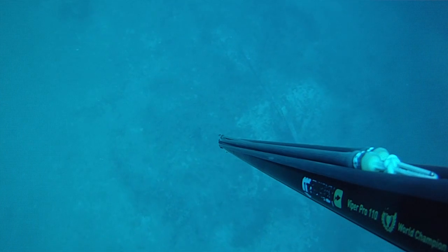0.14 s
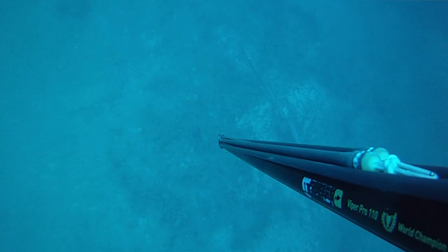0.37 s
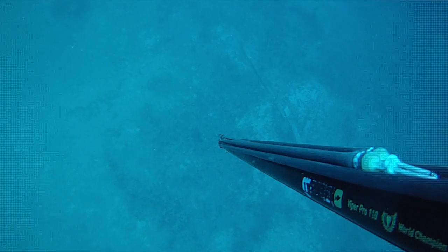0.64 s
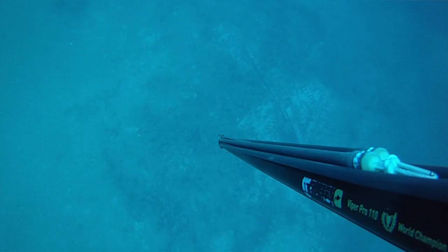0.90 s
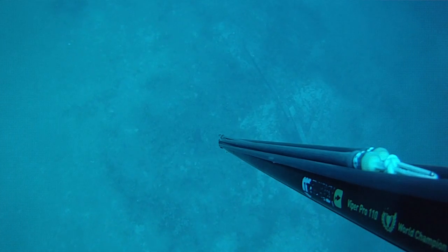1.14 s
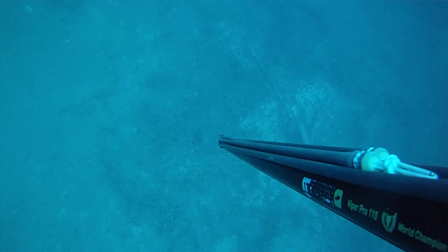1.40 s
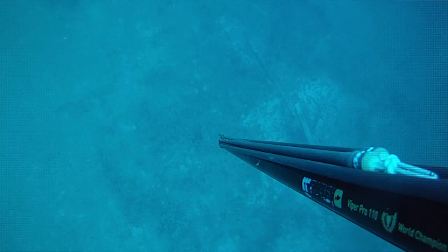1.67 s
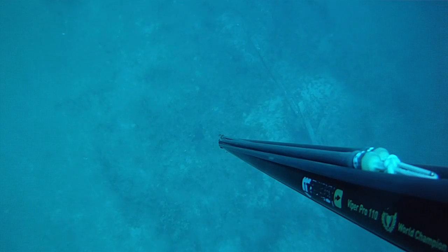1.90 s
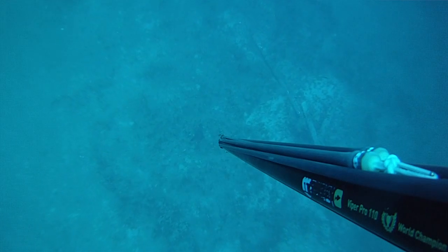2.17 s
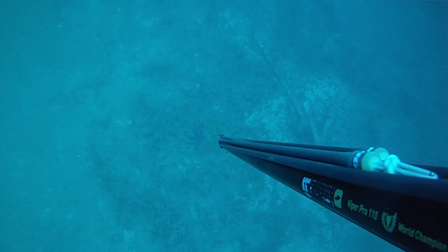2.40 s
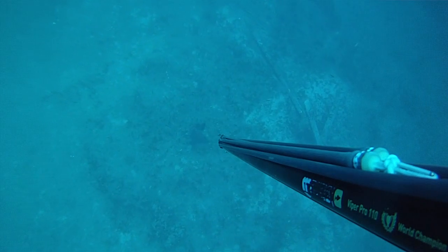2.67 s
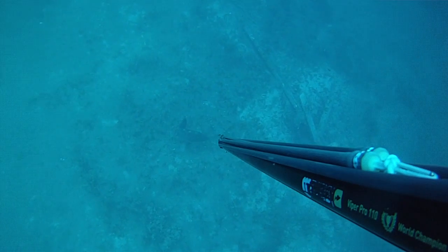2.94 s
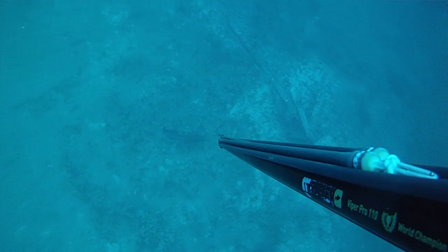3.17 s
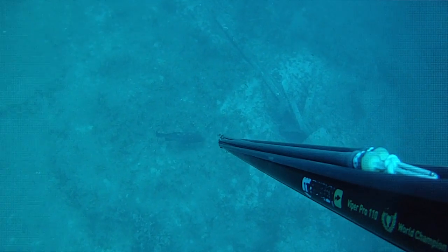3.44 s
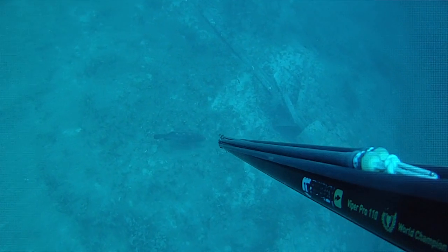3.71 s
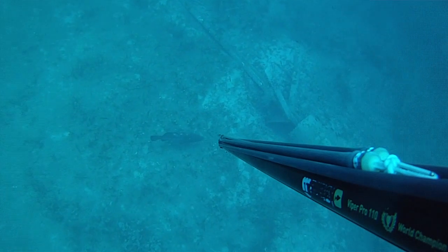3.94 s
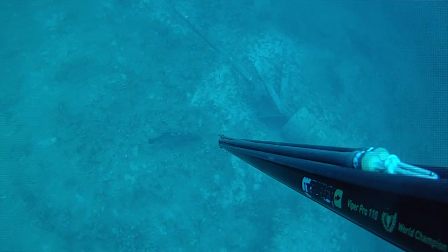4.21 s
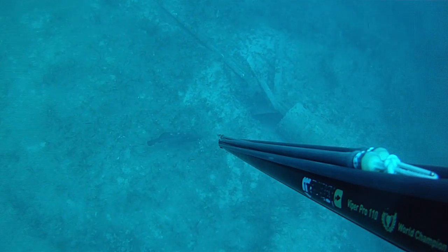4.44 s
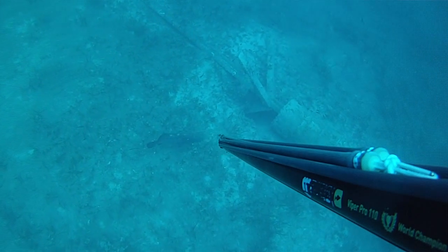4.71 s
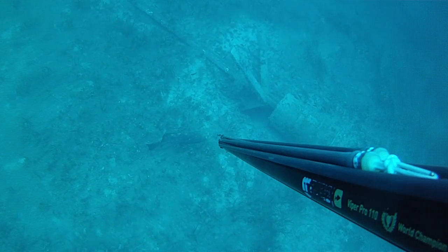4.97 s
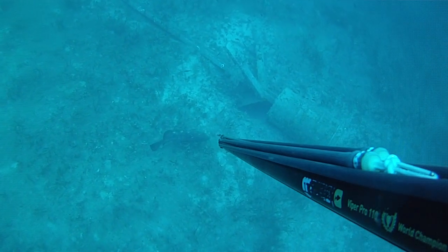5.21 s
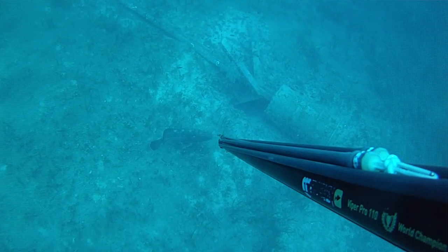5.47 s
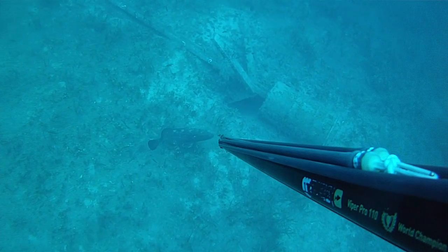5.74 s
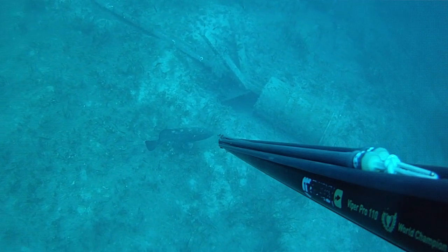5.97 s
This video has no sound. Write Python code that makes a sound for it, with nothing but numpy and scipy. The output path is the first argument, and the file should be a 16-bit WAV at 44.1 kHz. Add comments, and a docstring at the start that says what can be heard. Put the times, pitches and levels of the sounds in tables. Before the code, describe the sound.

The sound is underwater, boxed in and resonant, as if heard through a sealed case fixed near a speargun. From the start a distant boat motor idles unevenly, about sixteen turns a second, as hollow mid-pitched knocks blurred by a fine pattering wash. Hiss and a very faint high whine lie beneath, while shrimp crackle near and far; one bright snap comes at 0.15 seconds. At 0.5 a single violent, metallic crack overloads the microphone and dies within hundredths of a second; the background drops, then recovers over the next half second or so. Motor chatter continues, its low throb swelling and fading. From 2.9 to 3.5 louder knocks crowd together into a rattle and a hollow tone rises, peaking near 3.3. Soft grip thuds come at 3.9 and 5.2, more knocks around 4.7 to 4.9, and a sharp shrimp snap at 5.9, before it stops with the motor still idling at 6.1.

```python
"""A boat motor knocks at idle far off: four noise bursts a turn over a patter of tiny ticks, rung by a watertight case.
Under it sit a low throb, one held case tone and single louder knocks; shrimp snap near and far as sizzling clicks,
and the grip thuds softly as short swelling sines.
Half a second in, one hard blow on the speargun rings it as decaying modes, overloads the microphone and ducks the gain.
Hiss and a faint whine lie underneath."""
import sys
import numpy as np
from scipy import signal
from scipy.fft import rfft, irfft, next_fast_len
from scipy.io import wavfile

SR = 44100
rng = np.random.default_rng(int(sys.argv[2]) if len(sys.argv) > 2 else 0)


def to_wav(sig):
    """Store sig (one row per channel, or 1-D mono) as 16-bit WAV at the path in sys.argv[1].

    Samples outside -1..1 are clipped; the rate is SR.
    """
    pcm = np.clip(np.atleast_2d(sig), -1, 1) * 32767
    pcm = np.round(pcm).astype(np.int16)
    wavfile.write(sys.argv[1], SR, pcm.T)  # frames by channels


def gain_from_decibels(decibels):
    """Convert decibel values to linear amplitude factors."""
    exponent = np.asarray(decibels, float) / 20
    return 10 ** exponent


N = 269451  # samples


def rms_one(x):
    """Scale to unit rms."""
    return x / np.sqrt(np.mean(x ** 2) + 1e-20)


def in_time(rows):
    """Draw each column of a breakpoint table as a curve, one value a sample."""
    s, *columns = np.transpose(rows)
    return [np.interp(np.arange(N) / SR, s, column) for column in columns]


def resonate(x, hz, width_hz):
    """Two-pole resonance with a gain of about 1 at its top."""
    r = np.exp(-np.pi * width_hz / SR)
    feedback = [1, -2 * r * np.cos(2 * np.pi * hz / SR), r * r]
    return signal.lfilter([(1 - r * r) / 2, 0, (r * r - 1) / 2], feedback, x + 1e-18)


def drift(corner_hz):
    """Slow random wander with unit rms: noise through two equal low-pass poles."""
    r = np.exp(-2 * np.pi * corner_hz / SR)
    wander = signal.lfilter([1], [1, -2 * r, r * r], rng.standard_normal(N + SR))
    return rms_one(wander[SR:])  # the first second lets the filter settle


# resonances of the air and walls of the case: [pitch_hz, width_hz, level_db]
CASE_MODES = [(350, 790, -35), (735, 110, -23), (1005, 86.5, -8.5), (1164, 98, -2), (1320.7, 104, 0),
              (1620, 155, -3), (1793, 270, -15.5), (1997, 95, -40.5), (2433, 180, -23.5),
              (2937, 135, -22.5), (3426, 330, -30), (4650, 500, -33.5), (6520, 1100, -41),
              (6740, 1700, -56), (11200, 2300, -61.5), (14400, 1760, -44.5)]


def case(x, low_hz=0, high_hz=SR):
    """The case's resonances in parallel, signs alternating, so that dips fall between them."""
    return sum((-1) ** k * gain_from_decibels(level_db) * resonate(x, hz, width_hz)
               for k, (hz, width_hz, level_db) in enumerate(CASE_MODES) if low_hz <= hz < high_hz)


FLUTTER_DB, FLUTTER_HZ = 1.62, 48.4  # rms spread and corner of the drift


def fluttering_case(x):
    """The same resonances, each fed a little more or less from moment to moment."""
    out = 0
    for k, (hz, width_hz, level_db) in enumerate(CASE_MODES):
        fed = x * gain_from_decibels(FLUTTER_DB * drift(FLUTTER_HZ))
        out = out + (-1) ** k * gain_from_decibels(level_db) * resonate(fed, hz, width_hz)
    return out


# hiss spectrum ahead of the port's notch: [pitch_hz, level_db per Hz]
HISS_SPECTRUM = [(25, -94), (45, -90.5), (100, -97.5), (250, -95), (600, -91.5), (2000, -104), (6500, -109),
                 (10500, -109), (12500, -108), (15400, -101)]
WHINE_HZ, WHINE_RMS_DB = 7870, -65.5  # level ahead of the port's notch


def microphone_noise():
    """Smooth hiss and a faint steady whine of the electronics: shaped noise plus one sine."""
    size = next_fast_len(N)
    hz = np.maximum(np.arange(size // 2 + 1) * SR / size, 1)
    curve_hz, curve_db = np.transpose(HISS_SPECTRUM)
    colour = gain_from_decibels(np.interp(np.log(hz), np.log(curve_hz), curve_db)) * np.sqrt(SR / 2)
    hiss = irfft(rfft(rng.standard_normal(size)) * colour, size)[:N]
    whine = np.sqrt(2) * np.sin(2 * np.pi * WHINE_HZ * np.arange(N) / SR)
    return hiss + gain_from_decibels(WHINE_RMS_DB) * whine


# soft contacts of the grip: [start_s, level_db, pitch_hz, length_s]
GRIP_THUDS = [(0.277, -44.5, 363, 0.0038), (0.567, -52, 328, 0.017), (3.895, -35.5, 350, 0.014),
              (3.896, -51, 174, 0.021), (5.196, -45.5, 110, 0.012), (5.197, -38, 540, 0.0028),
              (5.203, -35.5, 380, 0.012), (5.465, -62, 70, 0.012)]


def thuds():
    """Soft contacts: each a low sine of one to six cycles that swells and dies."""
    out = np.zeros(N)
    for start_s, level_db, hz, length_s in GRIP_THUDS:
        t = np.arange(round(length_s * SR)) / SR
        at = round(start_s * SR)
        swell = np.sin(np.pi * t / length_s)
        out[at:at + len(t)] += gain_from_decibels(level_db) * swell * np.sin(2 * np.pi * hz * t)
    return out


# near snaps, weighed further by the parts below; the last three columns are relative to level_db:
# [start_s, level_db around 6.5 kHz, mid_db around 4.5 kHz, low_db below 3.2 kHz, top_db above 9 kHz]
NEAR_SNAPS = [(0.0427, -53, -3, 15, -21.5), (0.146, -33.5, 1, 4.5, -22), (0.1577, -53.5, 3, 18, -21),
              (0.173, -54, 4, 8, -21), (0.2097, -54, -7, 4, -30), (0.449, -54.5, -7, 13.5, -22),
              (0.6669, -52, 3, 7, -24), (0.7063, -56, 6, 20, -24), (0.7335, -49, -1, 10, -22),
              (0.9996, -49, 3, -2, -20), (1.186, -49, -7, 8, -22.5), (1.303, -48, -12, 1, -21),
              (1.544, -53, 4, 12.5, -21), (1.6073, -41.5, -2, 9, -20), (1.85, -52.5, 0, 1, -25),
              (1.899, -51, 1, -4, -19), (1.9584, -56, 5, -2, -21), (2.0467, -48, -10, -9, -18),
              (2.075, -49.5, -3, 3, -23), (2.111, -48, -2, 5.5, -18), (2.204, -46, -8, -6, -20),
              (2.3355, -51, -9, 5, -18.5), (2.38, -47.5, -1, 3, -26), (2.384, -47, -2, 10, -24),
              (2.4214, -45, 0, 6, -23), (2.497, -50, -1, 12.5, -25), (2.5052, -50.5, 5.5, 7, -23.5),
              (2.5412, -50, -2, -2, -22.5), (2.5562, -39, -4, -7, -17), (2.588, -56, 0, 9, -22),
              (2.711, -57, -3, 4, -22), (2.7647, -54, -3, 10, -25), (2.7915, -47, -7, 2, -27.5),
              (2.877, -48, -3, 9, -19), (2.8803, -42, 3, 11, -19.5), (2.994, -51.5, 7, 19, -20.5),
              (3.0335, -53, -1, 13, -23.5), (3.0686, -48.5, -8, -2, -22.5), (3.1953, -51, -6, -6, -22.5),
              (3.2173, -51, -4, -4, -22), (3.235, -50.5, 4.5, 17, -20), (3.2753, -52, 4, 12, -23),
              (3.809, -54, 2.5, 11, -23), (3.909, -50, 3.5, 11, -21), (4.1664, -53, -4.5, 5, -17),
              (4.2712, -55, 9.5, 12, -23), (4.2748, -50.5, 1.5, 17, -20), (4.285, -61, 0, 2, -23),
              (4.384, -50.5, 0, 4, -22), (4.4069, -58, 9, 14, -18), (4.431, -54, -2, 3, -24),
              (4.4717, -40.5, -4, 1, -29.5), (4.477, -50.5, 0, 10, -15), (4.6163, -52, -5, 1, -21.5),
              (4.6685, -49.5, -6, -5, -15.5), (4.7736, -48.5, -8, -3, -19), (4.7891, -49, -6, 1, -18),
              (4.814, -56, 10.5, 19, -24), (4.846, -58, 12, 16, -24), (4.9119, -48, 0, 9.5, -19),
              (4.9453, -58, 1, 9, -21), (4.9935, -50, -1, 2, -19), (5.0975, -59, 9, 11.5, -28),
              (5.231, -61, 8, 0, -19), (5.237, -71, 11, -10, -20), (5.3697, -54, 2, 6, -22),
              (5.4714, -52, 6.5, 14, -20), (5.4987, -57, 15, 5, -21), (5.542, -50, 4, -1, -21),
              (5.5646, -52, 3, 7, -20.5), (5.5891, -43.5, -11, -8, -23), (5.8235, -56, 10, 12, -21),
              (5.8275, -52, 10, 19, -21), (5.8491, -53.5, 2, 0, -21), (5.908, -32, -7, -7, -18.5),
              (5.9343, -49, -10, -3, -18), (5.9397, -51, -1.5, -5, -20), (6.0067, -45, -3, 7, -21),
              (6.0548, -52, 7, 9, -26.5)]
# parts of the case that a snap rings: [low_hz, high_hz, level_db]
RUNG_PARTS = [(5500, 9000, 3.5), (3200, 5500, 5), (1900, 3200, -1.5), (9000, 20000, 8.5), (1, 1900, -5)]
# far snaps: base rate and level floor; the rate clumps by a drift in dB, the colour varies by part
FAR_SNAPS_PER_S, FAR_CLUMP_DB, FAR_CLUMP_HZ = 170, 2.5, 9.0
FAR_SNAP_DB, FAR_SNAP_SPREAD_DB, FAR_COLOUR_DB = -66.5, 3.5, 1
SIZZLE_S = .0013  # time to fade to 1/e


def snaps():
    """A collapsing bubble is a click with a short sizzle; each snap weighs the parts of the case its own way."""
    start_s, level_db, mid_db, low_db, top_db = np.transpose(NEAR_SNAPS)
    at = np.round(start_s * SR).astype(int)
    far = rng.random(N) < FAR_SNAPS_PER_S * gain_from_decibels(FAR_CLUMP_DB * drift(FAR_CLUMP_HZ)) / SR
    far = far * gain_from_decibels(FAR_SNAP_DB + FAR_SNAP_SPREAD_DB * np.minimum(rng.exponential(1, N), 2))
    sizzle = rng.standard_normal(N)
    fade = np.exp(-1 / (SIZZLE_S * SR))
    out, unit = 0, signal.unit_impulse(999)
    near_weights_db = [0, mid_db, low_db, top_db, low_db]
    far_weights_db = [0.0, -4.0, 7.0, -23.5, 17.5]
    for (low_hz, high_hz, part_db), near_db, far_db in zip(RUNG_PARTS, near_weights_db, far_weights_db):
        clicks = far * gain_from_decibels(far_db + FAR_COLOUR_DB * np.clip(rng.standard_normal(N), -2, 1.5))
        clicks[at] = gain_from_decibels(level_db + near_db)
        clicks += 0.19 * sizzle * signal.lfilter([1], [1, -fade], clicks + 1e-18)
        # a unit click peaks at 1 in every part before the part's own level
        peak = np.abs(case(unit, low_hz, high_hz)).max()
        out = out + gain_from_decibels(part_db) * case(clicks, low_hz, high_hz) / peak
    return out


# crankshaft speed: [start_s, speed_turns_per_s]
CRANK_SPEED = [(0, 16.54), (.197, 15.73), (.394, 16.52), (.788, 15.27), (1.183, 17.22), (1.774, 15.39),
               (1.971, 16.06), (2.562, 14.55), (3.154, 16.34), (3.745, 15.31), (4.139, 16.41),
               (4.533, 15.07), (4.73, 15.49), (5.519, 16.05), (5.716, 16.11), (6.11, 16.57)]


def crank_turns():
    """Turns of the crankshaft so far, the running sum of its uneven idle speed."""
    return np.cumsum(in_time(CRANK_SPEED)[0]) / SR


BURST_SPREAD_DB, BURST_JITTER_S = 0.5, 0.00095


def bursts(turns, place_turns, fade_s):
    """One dying burst of noise every two turns, a little uneven in time and strength."""
    cycles = np.arange(0, turns[-1] - place_turns, 2)
    chance = rng.standard_normal((len(cycles), 2))
    at = np.interp(cycles + place_turns, turns, np.arange(N)) + chance[:, 0] * BURST_JITTER_S * SR
    starts = np.zeros(N)
    starts[np.clip(at, 0, N - 1).astype(int)] = gain_from_decibels(BURST_SPREAD_DB * chance[:, 1])
    envelope = signal.lfilter([1], [1, -np.exp(-1 / (fade_s * SR))], starts + 1e-18)
    return envelope * rng.standard_normal(N)


KNOCK_Q, KNOCK_BROAD_DB = 2.4, -12.5


def knock_colour(x, hz):
    """A knock favours one region and carries a weaker broad part."""
    width_hz = hz / KNOCK_Q
    favoured = resonate(x, hz, width_hz) * width_hz ** -.5
    return favoured + gain_from_decibels(KNOCK_BROAD_DB) * x * 1000 ** -.5


# knocks of the four-stroke cycle, levels relative: [place_turns (0-2), level_db, pitch_hz, fade_s]
KNOCK_CYCLE = [(0.212, -9, 1180, 0.0056), (0.384, -1.5, 2413, 0.0037), (0.725, -9.5, 1008, 0.0022),
               (0.902, -4, 1520, 0.0048), (1.217, -3.5, 1237, .0025), (1.382, -1, 2155, 0.011),
               (1.723, -5.5, 1050, 0.0016), (1.902, -4, 1620, 0.013)]


def cycle_knocks(turns):
    """Eight coloured noise bursts every two turns, each at its own place in the cycle."""
    return sum(gain_from_decibels(level_db) * knock_colour(bursts(turns, place_turns, fade_s), hz)
               for place_turns, level_db, hz, fade_s in KNOCK_CYCLE)


TICKS_PER_S, TICK_SPREAD_DB = 1300, 2


def patter():
    """The wash: a dense patter of tiny distant ticks of random size and sign."""
    sizes = gain_from_decibels(TICK_SPREAD_DB * np.minimum(rng.exponential(1, N), 4))
    return (rng.random(N) < TICKS_PER_S / SR) * sizes * rng.choice([-1, 1], N)


# centre pitch of the low throb: [start_s, pitch_hz]
THROB_CURVE = [(0, 671.8), (1.0, 661), (3.5, 670), (4.7, 771), (5.05, 735), (5.3, 668), (6.11, 652)]
THROB_PLACE_TURNS, THROB_WIDTH_HZ, THROB_FADE_S = 1.48, 80, 0.083
THROB_WANDER_HZ, THROB_WANDER_CORNER_HZ = 8, 4.3  # rms spread and corner of the drift


def low_throb(turns):
    """One narrow band of burst noise a cycle, carried on a wandering pitch, at unit rms."""
    narrow = signal.butter(2, THROB_WIDTH_HZ / 2, fs=SR, output="sos")
    pitch_hz = in_time(THROB_CURVE)[0] + THROB_WANDER_HZ * drift(THROB_WANDER_CORNER_HZ)
    phase = 2 * np.pi * np.cumsum(pitch_hz) / SR
    throb = 0
    for wave in (np.cos, np.sin):
        burst = bursts(turns, THROB_PLACE_TURNS, THROB_FADE_S)
        throb = throb + signal.sosfilt(narrow, burst) * wave(phase)
    return rms_one(throb)


# level of the held case tone: [start_s, level_db]
RING_LEVEL = [(0, -46.5), (.6, -44.5), (2.0, -46), (2.4, -38.5), (2.85, -51), (3.1, -41), (3.3, -33.5),
              (3.55, -40), (3.7, -53), (4.3, -48.5), (4.7, -45), (6.11, -49)]
RING_HZ, RING_WIDTH_HZ = 1318, 32  # width of each of two passes


def case_ring(water):
    """The motor excites one sharp resonance of the case, filtered twice to narrow it."""
    once = resonate(water, RING_HZ, RING_WIDTH_HZ)
    ring = resonate(once, RING_HZ, RING_WIDTH_HZ)
    return gain_from_decibels(in_time(RING_LEVEL)[0]) * rms_one(ring)


# motor as it arrives: [start_s, level_db, tilt_db (added to highs, taken from lows), throb_db]
MOTOR_LEVELS = [(0, -32.5, -1, -82), (.3, -38, 0, -72.5), (.65, -33, -3.5, -71), (1.0, -36, -5, -63),
                (1.8, -38.5, -4, -60.5), (2.25, -38, -6, -73.5), (2.9, -36.5, -0.5, -61),
                (3.4, -36.5, 2, -61.5), (3.65, -38, -0.5, -72), (4.1, -35.5, -1, -65),
                (4.55, -37.5, -3, -79), (4.8, -36.5, -5, -62.5), (5.1, -37, -3, -55.5),
                (5.56, -37.5, -0.5, -72.5), (6.11, -37, -3, -69)]
WASH_DB = 1.5  # patter against knocks
SWELL_DB, SHIFT_DB, SWELL_HZ = 0.7, 1.5, 3.6  # rms spread of level and tilt, corner of both drifts


def motor():
    """Knocks and patter rung by the case, swelling and tilting on the way, plus throb and held tone."""
    turns = crank_turns()
    knocks, wash = cycle_knocks(turns), patter()
    level_db, tilt_db, throb_db = in_time(MOTOR_LEVELS)
    level_db = level_db + SWELL_DB * drift(SWELL_HZ)
    tilt_db = tilt_db + SHIFT_DB * drift(SWELL_HZ)
    # balance the two by how loud each comes out of the case
    mix = knocks / case(knocks).std() + gain_from_decibels(WASH_DB) * wash / case(wash).std()
    water = rms_one(fluttering_case(mix))
    # the path through the water shifts: lows and highs trade strength slowly
    lows = signal.sosfilt(signal.butter(1, 1400, fs=SR, output="sos"), water)
    tilted = gain_from_decibels(-tilt_db) * lows + gain_from_decibels(tilt_db) * (water - lows)
    return gain_from_decibels(level_db) * tilted + gain_from_decibels(throb_db) * low_throb(turns) + case_ring(water)


# knocks that stand out of the cycle: [start_s, level_db, upper_db (upper region's part, at most 0), fade_s]
SINGLE_KNOCKS = [(0.0525, -18.5, -1.5, 0.027), (0.1446, -17.5, -2.5, 0.0062), (0.258, -24.5, -19, 0.0056),
                 (0.8688, -22, 0, 0.0043), (1.057, -23.5, -4.5, 0.0084), (1.293, -22, -7, 0.0033),
                 (1.354, -25, -1.5, 0.013), (1.796, -25, -8, 0.0049), (2.1043, -20, -21, 0.004),
                 (2.3211, -22, 2, 0.005), (2.569, -24, -12, 0.0039), (2.7387, -25.5, -3, 0.0033),
                 (2.8668, -20.5, -2.5, 0.02), (2.897, -24, -1, 0.0056), (2.9827, -24.5, -9, 0.0044),
                 (2.9936, -21, 4, 0.0097), (3.025, -24.5, 0.5, 0.005), (3.045, -32, 0, 0.0035),
                 (3.087, -21.5, 0, 0.0048), (3.102, -21.5, -12, 0.003), (3.1197, -22, 3, 0.0044),
                 (3.153, -25.5, -1, 0.005), (3.2114, -22, -4, 0.019), (3.242, -20, -3, 0.0045),
                 (3.273, -22, -16, 0.0041), (3.3691, -20.5, -1, 0.0081), (3.3983, -17, -24, 0.0041),
                 (3.4299, -22, -23, 0.0041), (3.462, -21.5, -6, 0.0056), (3.523, -23.5, -15.5, 0.0063),
                 (3.5415, -22.5, -17, 0.005), (4.012, -30, 1, 0.0099), (4.6701, -23.5, -6, 0.0076),
                 (4.7349, -19.5, -11, 0.0043), (4.8, -21, -6.5, 0.0055), (4.9116, -18.5, -1.5, 0.0066),
                 (5.185, -26.5, 1, 0.0037), (5.8001, -24, 2.5, 0.0061), (5.8667, -25, -2.5, 0.0055),
                 (5.9351, -24.5, -5.5, 0.012), (5.993, -26, -0.5, 0.013), (6.0736, -30, -17, 0.0042)]
LOWER_HZ, UPPER_HZ, REGION_WIDTH_HZ = 1367, 1630, 220
LOUD_CLICK, LOUD_RISE_S = 17.6, 0.00068  # click in units of the noise's spread; rise of the noise


def loud_knocks():
    """A soft click and a few milliseconds of noise, shared between two regions of the case."""
    out, length = np.zeros(N), 3000
    t = np.arange(length) / SR
    noises = rng.standard_normal((len(SINGLE_KNOCKS), length))
    for (start_s, level_db, upper_db, fade_s), noise in zip(SINGLE_KNOCKS, noises):
        noise = noise * np.exp(-t / fade_s) * (1 - np.exp(-t / LOUD_RISE_S))
        noise[0] = LOUD_CLICK
        lower, upper = (case(resonate(resonate(noise, hz, REGION_WIDTH_HZ), hz, 570))
                        for hz in (LOWER_HZ, UPPER_HZ))
        share = min(gain_from_decibels(upper_db), 1)
        heard = np.sqrt(1 - share ** 2) * lower / np.abs(lower).max() + share * upper / np.abs(upper).max()
        at = round(start_s * SR)
        out[at:at + length] += (gain_from_decibels(level_db) * heard)[:N - at]
    return out


# modes the gun rings with, far above full scale at first: [pitch_hz, level_db, t60_s]
GUN_MODES = [(1407.5, 55.13, .00956), (1482.5, 37.12, .01311), (1348, 26.69, .02727), (1314, -.69, .0858),
             (1590.2, 11.43, .02014), (1592.3, 59.73, .00299)]
BLOW_S = .508633


def blow():
    """One sharp hit starts every mode of the gun at once, each an eighth of a turn past its top."""
    t = np.arange(N) / SR - BLOW_S
    rings = sum(gain_from_decibels(level_db - 60 * np.abs(t) / t60_s) * np.cos(2 * np.pi * hz * t + np.pi / 4)
                for hz, level_db, t60_s in GUN_MODES)
    onset = np.clip(t * SR / 2 + .5, 0, 1)  # opens over two samples
    return onset * rings


PORT_NOTCH_HZ, PORT_NOTCH_Q = 9020, 1.78


def scene():
    """All sound at the microphone, whose port cancels a band of treble."""
    heard = microphone_noise() + thuds() + snaps() + motor() + loud_knocks() + blow()
    return signal.lfilter(*signal.iirnotch(PORT_NOTCH_HZ, PORT_NOTCH_Q, SR), heard)[None, :]


def top_cut(x):
    """Nothing passes above the cut-off."""
    return signal.sosfilt(signal.butter(12, 15500, fs=SR, output="sos"), x)


DUCK_DB_PER_DB, DUCK_FROM_DB, DUCK_ATTACK_S, DUCK_RELEASE_S = .85, -9.5, .0035, .17
TOP_HZ = 15050  # top of the pass band


def record(dry):
    """Gain control ducks after a loud sound and creeps back; the converter clips; the top is cut."""
    t = np.arange(N) / SR
    peak_db = 20 * np.log10(np.minimum(np.abs(dry[0]), 1) + 1e-9)
    over_db = np.maximum(peak_db - DUCK_FROM_DB, 0) * DUCK_DB_PER_DB
    # peak hold with an exponential release, then a one-pole attack
    held = np.exp(np.maximum.accumulate(np.log(over_db + 1e-6) + t / DUCK_RELEASE_S) - t / DUCK_RELEASE_S)
    r = np.exp(-1 / (DUCK_ATTACK_S * SR))
    duck_db = signal.lfilter([1 - r], [1, -r], held)
    clipped = np.clip(dry * gain_from_decibels(-duck_db), -1, 1)
    passed = signal.sosfiltfilt(signal.butter(8, TOP_HZ, fs=SR, output="sos"), clipped)
    return top_cut(np.clip(passed, -1, 1))


dry = scene()
out = record(dry)
to_wav(out)
```